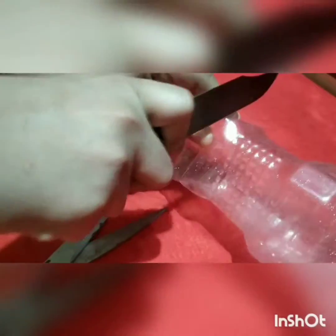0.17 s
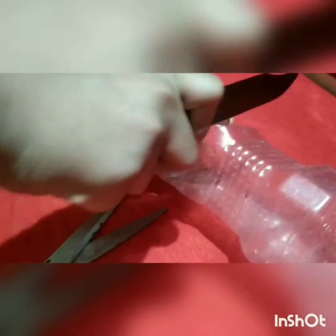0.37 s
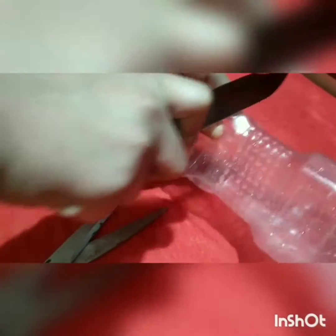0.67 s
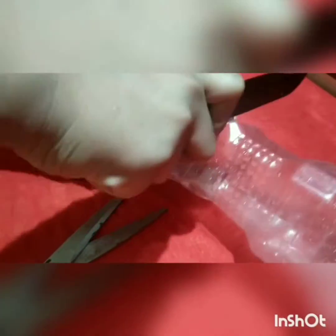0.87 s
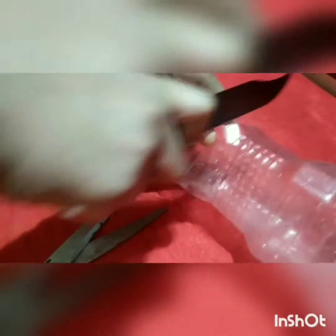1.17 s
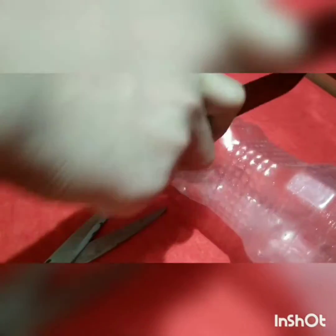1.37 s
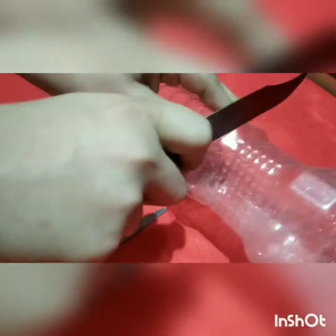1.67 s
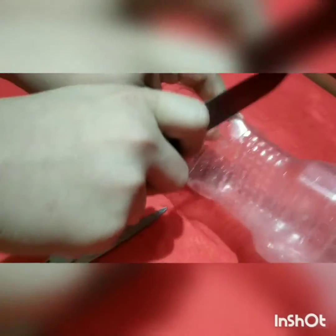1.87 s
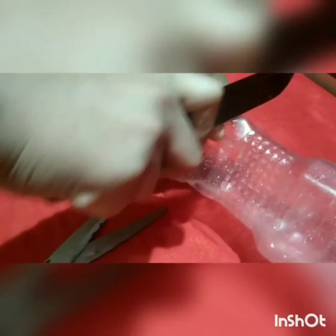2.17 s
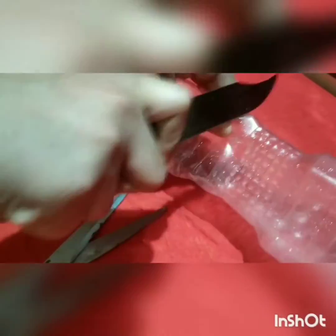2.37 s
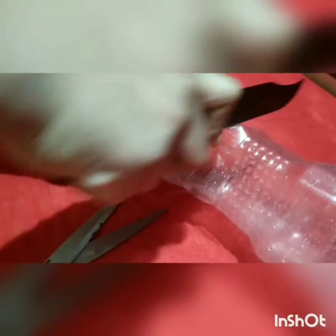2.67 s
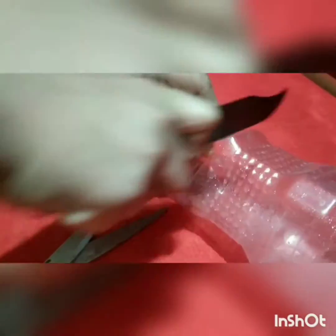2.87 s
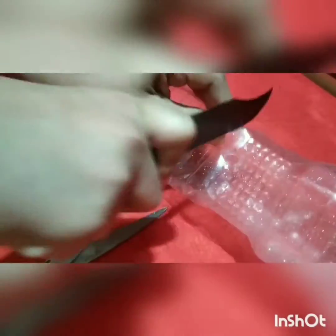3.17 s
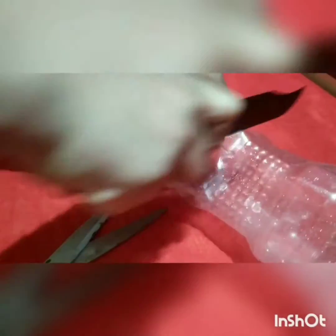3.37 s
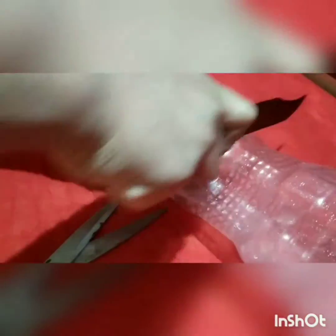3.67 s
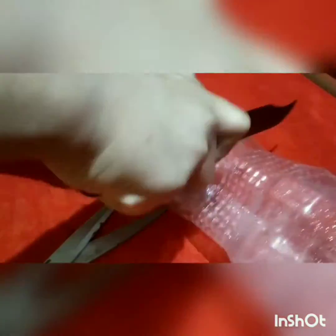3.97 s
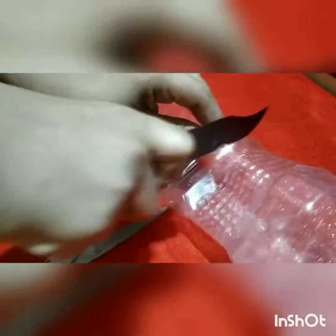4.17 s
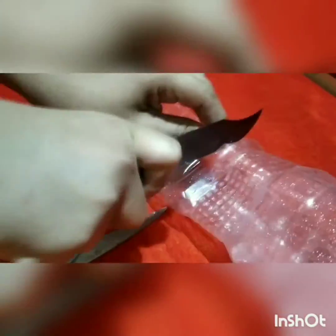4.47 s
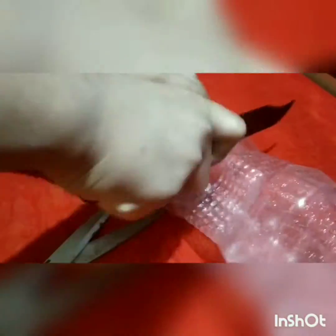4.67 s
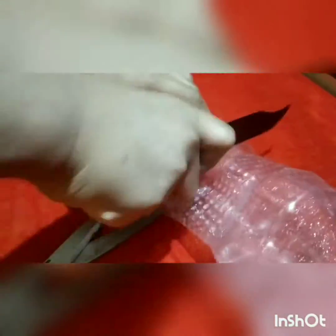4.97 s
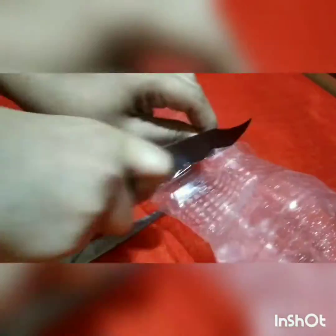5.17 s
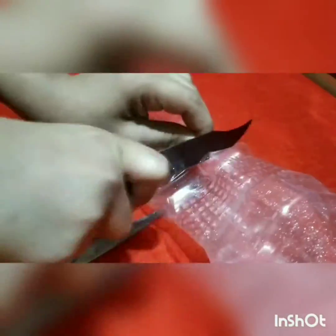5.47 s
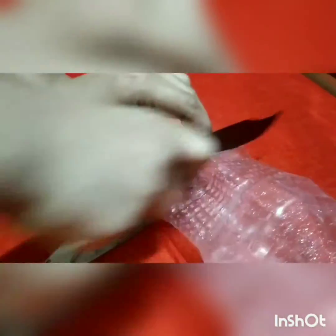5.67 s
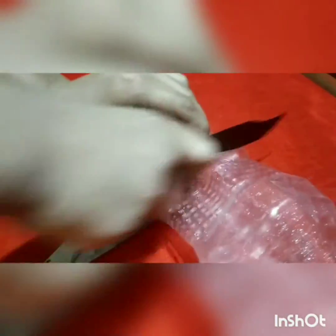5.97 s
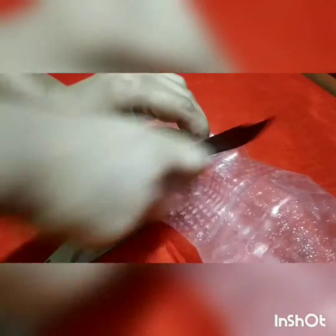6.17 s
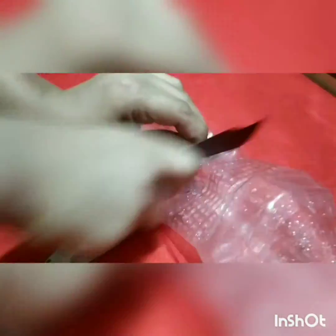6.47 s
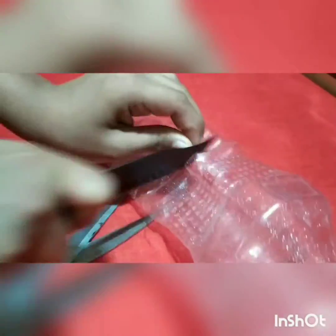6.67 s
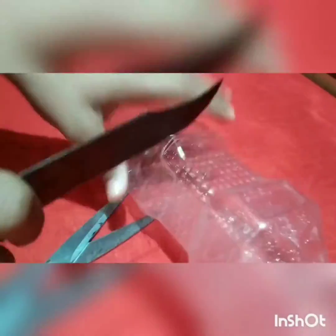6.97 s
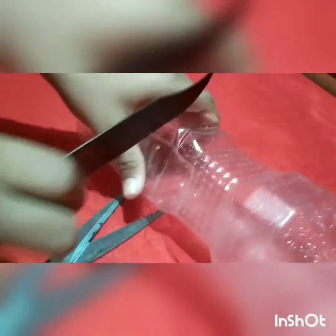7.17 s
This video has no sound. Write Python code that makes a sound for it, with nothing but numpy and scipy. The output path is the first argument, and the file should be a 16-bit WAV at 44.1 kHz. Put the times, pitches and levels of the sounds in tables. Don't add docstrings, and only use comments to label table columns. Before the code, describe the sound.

Quick dry rasping strokes of a blade on a droning plastic bottle wall, with sudden sharp buckling snaps, close up indoors.

```python
import sys
import numpy as np
from scipy import signal
from scipy.fft import rfft, irfft, next_fast_len
from scipy.io import wavfile
from scipy.ndimage import uniform_filter1d, minimum_filter1d

SR = 44100
rng = np.random.default_rng(int(sys.argv[2]) if len(sys.argv) > 2 else 0)


def generate_wav(sig):
    pcm = np.round(np.clip(np.atleast_2d(sig).T, -1, 1) * 32767).astype(np.int16)
    wavfile.write(sys.argv[1], SR, pcm)


def makeup_ratio(level_db):
    decades = np.asarray(level_db, float) / 20
    return 10 ** decades


N = 322371
TIME = np.arange(N) / SR

# (frequency [Hz], width [Hz], level [dB])
WALL_MODES = [(203, 69, -11.5), (337.7, 21, -8.5), (391, 26, -7), (473, 64, -3), (550.5, 53, -4.5),
              (665, 84, -5), (797, 70, -5.5), (898, 50, -5.5), (986, 108, -6), (1150, 110, -9.5),
              (1257, 64, -13.5), (1710, 740, -4.5), (2240, 430, -9)]


def at_hz(points, hz):
    table = np.array(points)
    return np.interp(np.log(np.maximum(hz, 1)), np.log(table[:, 0]), table[:, 1])


def rms_one(x):
    return x / np.sqrt(np.mean(x ** 2) + 1e-20)


def peak_one(x):
    return x / abs(x).max()


def shaped(x, spectrum):
    size = next_fast_len(x.shape[-1])
    gain = makeup_ratio(at_hz(spectrum, np.fft.rfftfreq(size, 1 / SR)))
    return irfft(rfft(x, size) * gain, size)[..., :x.shape[-1]]


def coloured(x, spectrum):
    return rms_one(shaped(x, spectrum))


def band_pass(x, low_hz, high_hz, order=2):
    sos = signal.butter(order, [low_hz, high_hz], "band", fs=SR, output="sos")
    return signal.sosfilt(sos, x)


def resonance(x, hz, width_hz):
    r = np.exp(-np.pi * width_hz / SR)
    zeros = np.array([1, 0, -1]) * (1 - r * r) / 2
    poles = [1, -2 * r * np.cos(2 * np.pi * hz / SR), r * r]
    return signal.lfilter(zeros, poles, x)


def drift(rate_per_s):
    knots = rng.standard_normal(1000)
    return np.interp(TIME * rate_per_s, np.arange(len(knots)), knots)


def two_ports(mid, side):
    # (frequency [Hz], level [dB])
    side_over_mid = [(25, -8), (60, -20), (130, -20.5), (250, -2), (500, 0), (1300, 3), (4000, -2),
                     (15000, 1)]
    side = shaped(side, side_over_mid)
    return np.array([mid + side, mid - side])


def background():
    # (time [s], level [dB])
    rumble_levels = [(0.0, -39), (0.12, -40), (0.67, -54.5), (2.63, -48.5), (2.95, -41), (3.5, -53.5),
                     (3.77, -40.5), (3.83, -47), (4.05, -43), (4.07, -46.5), (5.19, -47), (5.44, -37),
                     (5.58, -43), (6.49, -48.5), (6.54, -41), (7.31, -54)]
    # (frequency [Hz], density [dB per Hz])
    rumble_spectrum = [(20, -34.5), (60, -9), (76, -3.5), (86, -5), (97, -1.5), (108, -11.5), (150, -12),
                       (260, -57)]
    # (frequency [Hz], density [dB per Hz])
    hiss_spectrum = [(88, -28), (150, -1), (431, -15.5), (524, -16), (1360, -24.5), (1500, -28.5),
                     (16000, -31)]
    lump_db, lumps_per_s = 1.5, 12.0
    rumble_side_db, hiss_db = 3, -55

    white = rng.standard_normal((4, N))
    level_db = np.interp(TIME, *np.transpose(rumble_levels)) + lump_db * drift(lumps_per_s)
    mid, side = coloured(white[:2], rumble_spectrum)
    rumble = makeup_ratio(level_db) * two_ports(mid, side * makeup_ratio(rumble_side_db))
    hiss = two_ports(*coloured(white[2:], hiss_spectrum))
    return rumble + makeup_ratio(hiss_db) * hiss


def room(x, length=22050):
    # (frequency [Hz], T60 [s])
    decay_times = [(100, 0.38), (500, 0.29), (3000, 0.26), (13000, 0.21)]
    echo_db, left_lag_s, build_up_s = -5.5, .00005, 0.0019

    t, tails = np.arange(length) / SR, 0
    white = rng.standard_normal((2, 2, length))
    edges_hz = 50 * 2 ** np.arange(0, 8.6, .5)
    for k, (low, high) in enumerate(zip(edges_hz, edges_hz[1:])):
        band = band_pass(white[k % 2], low, high)
        tails = tails + band * makeup_ratio(-60 * t / at_hz(decay_times, np.sqrt(low * high)))
    tails = two_ports(*(tails * (1 - np.exp(-t / build_up_s))))

    bins = rfft(tails)
    power = abs(bins) ** 2
    fine, broad = uniform_filter1d(power, size=41), uniform_filter1d(power, size=401)
    tails = irfft(bins / np.sqrt(fine) * np.sqrt(broad), length)
    tails = makeup_ratio(echo_db) * tails / np.sqrt(np.sum(tails ** 2) / 2)

    direct = np.array([np.interp(TIME - left_lag_s, TIME, x[0]), x[1]])
    return direct + signal.fftconvolve(direct, tails, axes=1)[:, :N]


def dent_wall(push, dent_hz, mode_offsets_db):
    wall = 0
    for (hz, width_hz, level_db), offset_db in zip(WALL_MODES, mode_offsets_db):
        db_per_oct = 4.7 if hz > dent_hz else 10
        mode_db = level_db + offset_db - db_per_oct * abs(np.log2(hz / dent_hz))
        wall = wall + makeup_ratio(mode_db) * resonance(push, hz, width_hz)
    return wall


def pops(length=4096):
    # (time [s], peak [dB], dent pitch [Hz], crack over peak [dB], reach above pitch [octaves])
    buckles = [(1.443, -8.5, 1700, -23, 1.1), (1.476, 2.5, 676, -9, 1.53), (1.499, 3.5, 780, -39, 1.8),
               (1.79, -12, 980, -44, 1.03), (1.876, 0, 1090, -1.5, 1.7), (1.877, -19, 187, -32, 0.79),
               (2.119, -0.2, 870, 0.5, .96), (2.123, -9.5, 710, -30.5, 1.1), (2.88, 3, 265, -36.5, 3.04),
               (2.882, 5.5, 1150, -18, 0.55), (3.723, -0.5, 464, -5, 1.9), (3.726, -11, 1290, 5, 1.9),
               (3.768, 2.5, 483, -42, 0.6), (3.777, 0.8, 1120, -38.5, 3.9), (4.73, 7.5, 974, -15.5, 0.91),
               (4.735, -2, 750, -17, 0.76), (5.144, -9.5, 794, -3, 1.3), (6.234, 3.5, 1170, -12, 1.03),
               (6.816, -4.5, 750, -13.5, 2.2), (6.878, 4.5, 1043, -13, 3.1), (6.896, -2.5, 513, -33, 0.26),
               (6.937, -2.5, 800, -10, 1.47), (6.948, -2.5, 1090, -25, 1.3)]
    # (time [s], peak [dB], pitch [Hz], reach above pitch [octaves])
    creases = [(0.126, -35, 436, 0.47), (0.355, -27.5, 475, 0.39), (0.682, -23.5, 396, 0.4),
               (1.398, -32.5, 5000, 0.69), (1.424, -27, 700, .6), (1.723, -25, 470, 0.7),
               (2.078, -35.5, 355, 2), (2.953, -12.5, 292, 0.15), (3.083, -19, 220, 0.64),
               (3.253, -22.5, 232, 0.24), (3.614, -27, 371, .89), (3.847, -8, 760, 1),
               (3.932, -15, 1460, 0.28), (4.084, -23, 470, 1.9), (4.154, -14, 1040, 0.49),
               (4.823, -10, 1095, 1.9), (5.319, -9.5, 855, 2.8), (5.536, -21.5, 424, 2.4),
               (6.215, -14, 1890, 2.7), (6.474, -19.5, 800, 0.52), (6.539, -14.5, 786, 2.1),
               (6.765, -18.5, 600, 1), (6.806, -19.5, 573, 1.5)]
    buckle_rattle_ms, crease_rattle_ms, crease_crack_db = 3.4, 5.1, -27.5
    dent_width = .45

    dents = [(*row, buckle_rattle_ms) for row in buckles]
    dents += [(s, peak_db, hz, crease_crack_db, reach, crease_rattle_ms)
              for s, peak_db, hz, reach in creases]
    out, t = np.zeros((2, N + length)), np.arange(length) / SR
    noises = rng.standard_normal((len(dents), length))
    offsets_db = rng.normal(0, 1.0, (len(dents), len(WALL_MODES)))
    for (s, peak_db, hz, crack_db, reach, rattle_ms), noise, offset_db in zip(dents, noises, offsets_db):
        rattle = noise * np.exp(-t / (rattle_ms / 1000)) + 2.87 * (t == 0)
        soft = signal.butter(3, np.clip(hz * 2 ** reach, 100, 15000), fs=SR, output="sos")
        push = signal.sosfilt(soft, rattle)
        dent = resonance(push, hz, dent_width * hz)
        wall = dent_wall(push, hz, offset_db)
        body = peak_one(peak_one(dent) + makeup_ratio(9.0) * peak_one(wall))

        crack = noise * (1 - np.exp(-t / 0.00021)) * np.exp(-t / 0.001)
        for _ in range(2):
            crack = band_pass(crack, 3000, 7500, order=1)
        crack = makeup_ratio(crack_db + 4.5) * peak_one(crack)

        at = round((s + .001) * SR)
        out[:, at:at + length] += makeup_ratio(peak_db - 1.5) * np.array([body, crack])
    return out[:, :N]


def slips(per_s, spread_db):
    sizes = makeup_ratio(spread_db * np.minimum(rng.exponential(1, N), 5)) * rng.choice([-1, 1], N)
    return rms_one(sizes * (rng.random(N) < per_s / SR))


def bottle(force, wander_db):
    # (time [s], level of upper wall modes [dB])
    slit_growth = [
        (0, 5),
        (1.4, -1.5),
        (2.5, -4.2),
        (4.5, -2.2),
        (7.3, -3.7),
    ]
    upper_from_hz, wanders_per_s = 1450, 12.0
    upper_db = np.interp(TIME, *np.transpose(slit_growth))
    drone = 0
    for k, (hz, width_hz, level_db) in enumerate(WALL_MODES):
        mode_db = level_db + (hz > upper_from_hz) * upper_db + wander_db * drift(wanders_per_s)
        mode = resonance(force, hz, width_hz) / np.sqrt(width_hz)
        drone = drone + (-1) ** k * makeup_ratio(mode_db) * mode
    return drone


def strokes():
    # (time [s], length [s], hiss [dB])
    pushes = [(0.109, 0.13, -55), (0.484, 0.14, -49), (0.975, 0.15, -48), (2.336, 0.13, -48),
              (2.705, 0.14, -47.5), (3.094, 0.13, -43.5), (3.449, 0.12, -46.5), (3.806, 0.1, -45),
              (4.124, 0.13, -44), (4.451, .126, -41.5), (4.782, 0.11, -40.5), (5.093, 0.12, -40),
              (5.42, 0.11, -41), (5.721, 0.12, -40), (6.025, 0.14, -39), (6.322, 0.14, -41.5),
              (6.646, 0.29, -39)]
    # (time [s], length [s], hiss [dB])
    pulls = [(0.302, 0.14, -51.5), (0.752, 0.18, -51), (1.189, 0.17, -47.5), (2.509, 0.15, -46.5),
             (2.919, 0.13, -46.5), (3.265, 0.14, -46), (3.604, 0.14, -46.5), (3.955, 0.12, -42.5),
             (4.287, 0.15, -43.5), (4.61, 0.16, -41), (4.933, 0.11, -41), (5.257, 0.13, -41.5),
             (5.568, 0.13, -39.5), (5.863, 0.15, -39.5), (6.493, 0.12, -40.5)]
    # (time [s], length [s], hiss [dB], drone over hiss [dB], sharpness [dB])
    tears = [
        (0.701, .022, -85, 19, 14),
        (1.459, 0.083, -29.5, 3, -6),
        (5.133, 0.026, -40.5, -11, 4.5),
        (6.216, 0.079, -26.5, 1, -2),
        (6.865, 0.14, -40.5, -0.5, -12.5),
        (7.044, 0.069, -62, 16, -1),
    ]
    # (time [s], length [s], hiss [dB], drone over hiss [dB], sharpness [dB])
    skids = [
        (1.875, 0.027, -20, -1.5, -10),
        (2.119, 0.044, -19.5, -3, -1.5),
        (3.722, 0.056, -22, -5, -7),
    ]

    moves = [(*row, 7, -2.7, 0.58) for row in pushes]
    moves += [(*row, 8.5, -1.7, 0.49) for row in pulls]
    moves += [(*row, 0.39) for row in tears]
    moves += [(*row, 0.043) for row in skids]

    t = TIME[::32]
    hiss, sharp, drone = np.zeros((3, len(t)))
    for s, length_s, hiss_db, drone_db, sharp_db, rise_share in moves:
        rise_s = rise_share * length_s
        phase = np.interp(t, [s - 0.16 * rise_s, s + rise_s, s + length_s], [0, .5, 1])
        speed = np.maximum(np.sin(np.pi * phase), 0) ** 0.57
        hiss += makeup_ratio(hiss_db) * speed
        sharp += makeup_ratio(hiss_db + sharp_db) * speed ** 1.83
        drone += makeup_ratio(hiss_db + drone_db) * speed
    return [np.interp(TIME, t, level) for level in (hiss, sharp, drone)]


def knife():
    # (frequency [Hz], density [dB per Hz])
    scrape_spectrum = [(760, -23), (1300, -7), (2170, -4.5), (3450, -4.5), (3880, -4), (9170, -1.5),
                       (15200, -2), (16000, -20)]
    patch_edges_hz = 700 * 2 ** np.arange(0, 4.7, .5)

    hiss, sharp, drone = strokes()
    hail = two_ports(slips(9000.0, 3), slips(9000.0, 3))
    edge, scrape = coloured(hail, scrape_spectrum), 0
    for k, (low, high) in enumerate(zip(patch_edges_hz, patch_edges_hz[1:])):
        share = np.clip(np.log2(low / 3500) / 1.16, 0, 1)
        level = makeup_ratio(2.7 * drift(18.0)) * ((1 - share) * hiss + share * sharp)
        scrape = scrape + (-1) ** k * level * band_pass(edge, low, high)
    wall = rms_one(bottle(slips(2500.0, 2.53), wander_db=2.5))
    bite = makeup_ratio(1.68 * drift(45.0) + 1.56 * drift(130.0))
    return bite * (makeup_ratio(8.5) * scrape + makeup_ratio(1.5) * drone * wall)


def scene():
    # (frequency [Hz], level [dB])
    left_over_right = [(60, 12.5), (110, 0.5), (380, -0.7), (1000, -2.5), (2380, 0.8), (4400, 0.1),
                       (8120, 1.5), (15000, 5.5)]
    body, crack = pops()
    near = room(knife() + body + crack) + makeup_ratio(-2.0) * crack
    lean = np.array(left_over_right) * [1, .5]
    left, right = shaped(near[0], lean), shaped(near[1], lean * [1, -1])
    return np.array([left, right]) + background()


def suppressor(x, size=1024):
    subtract, least_db = .27, -8
    mutes_per_s, mute_s, mute_db, active_from_hz = 1.7, .06, -35, 1500

    hz, s, bins = signal.stft(x, SR, "cosine", nperseg=size)
    level = uniform_filter1d(abs(bins), size=3, axis=2)
    around = uniform_filter1d(level, size=15, axis=1) + 1e-12
    kept_power = 1 - subtract * (around / (level + 1e-12)) ** 2
    gain = np.maximum(kept_power, makeup_ratio(2 * least_db)) ** .5

    hop_s = s[1] - s[0]
    group = (14 * (hz / 1000) ** .7).astype(int)
    odds = mutes_per_s * hop_s * (.4 + (hz / 11000) ** 2)
    group_odds = odds[np.searchsorted(group, group), None]
    begins = rng.random((len(hz), len(s)))[group] < group_odds
    muted = -minimum_filter1d(-1. * begins, size=round(mute_s / hop_s), axis=1)
    treble_gain = gain * makeup_ratio(mute_db * muted) / np.sqrt(1 - subtract)
    gain = np.where((hz > active_from_hz)[:, None], treble_gain, 1)

    power = np.sum(abs(bins) ** 2, axis=(0, 1)) + 1e-18
    gain[..., 2:] = np.where(power[2:] > 30 * power[:-2], 1, gain[..., 2:])
    return signal.istft(bins * gain, SR, "cosine", nperseg=size)[1][:, :N]


def top_cut(x):
    return signal.sosfilt(signal.butter(12, 16690, fs=SR, output="sos"), x)


def record(dry):
    # (frequency [Hz], gain [dB])
    mic_response = [(100, -0.5), (9000, -2.5), (12000, -5.5), (14000, -7.5), (15600, -6), (16400, -46)]
    ceiling = .95
    squeezed = ceiling * np.tanh(dry / ceiling)
    mix = suppressor(shaped(squeezed, mic_response))
    return top_cut(mix)


dry = scene()
out = record(dry)
generate_wav(out)
```